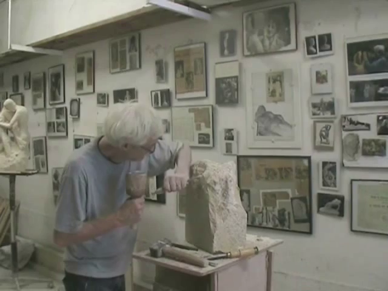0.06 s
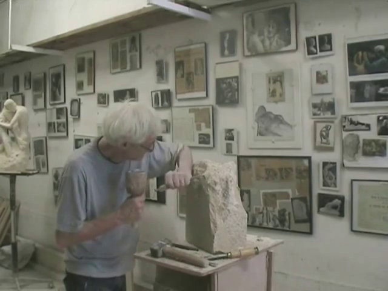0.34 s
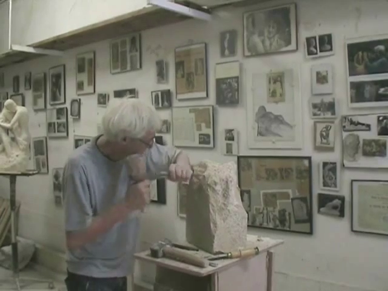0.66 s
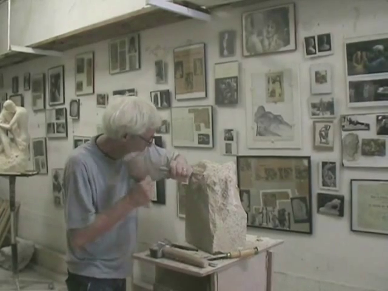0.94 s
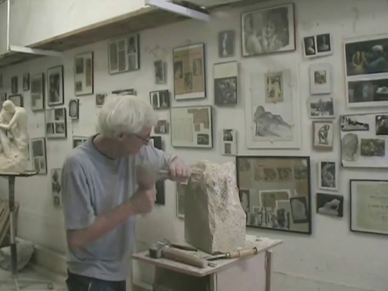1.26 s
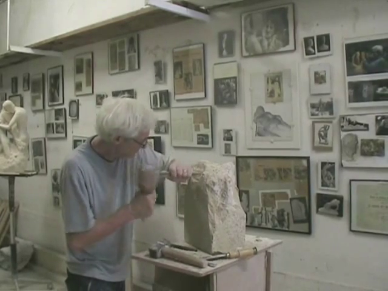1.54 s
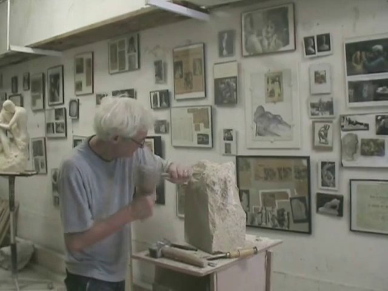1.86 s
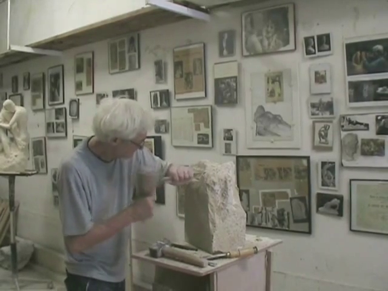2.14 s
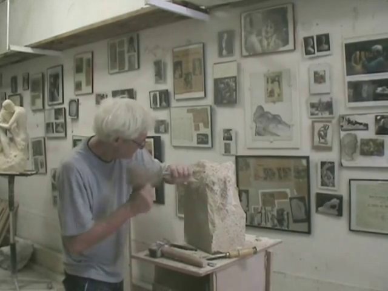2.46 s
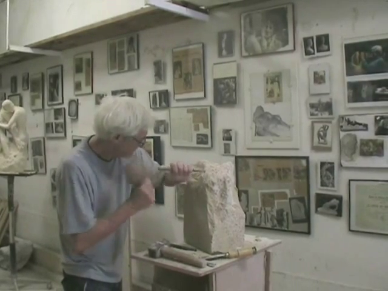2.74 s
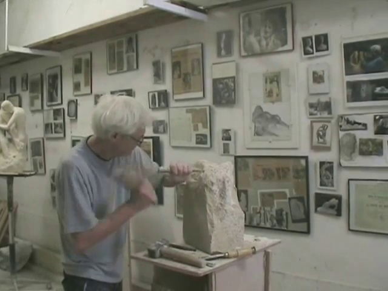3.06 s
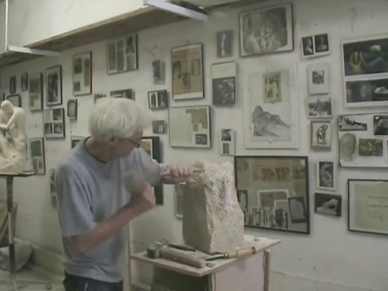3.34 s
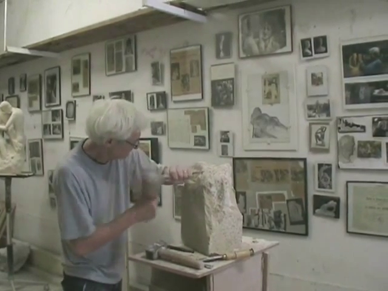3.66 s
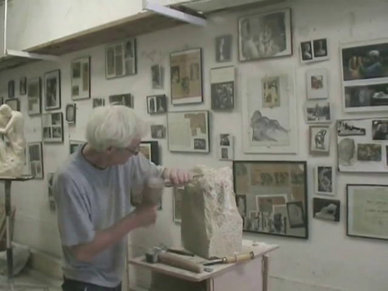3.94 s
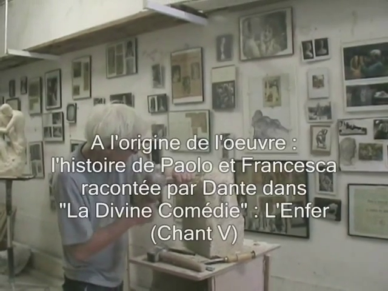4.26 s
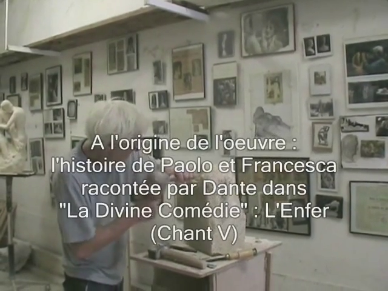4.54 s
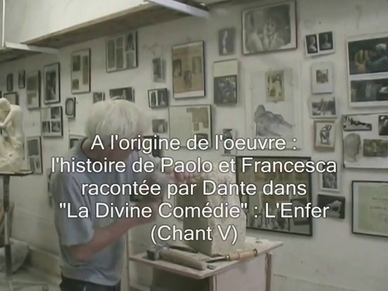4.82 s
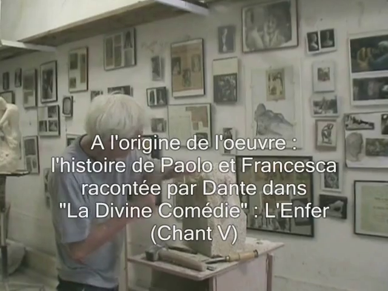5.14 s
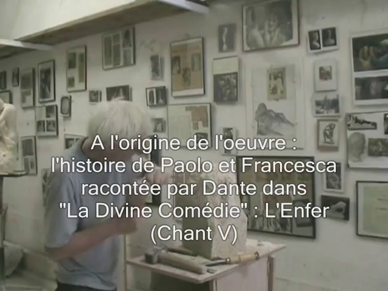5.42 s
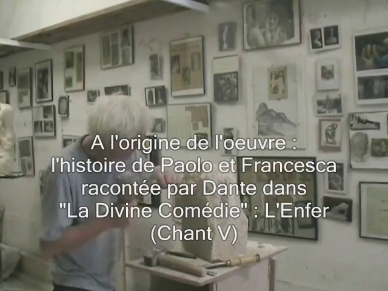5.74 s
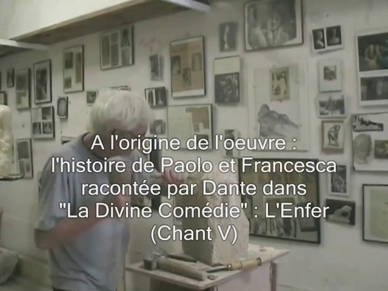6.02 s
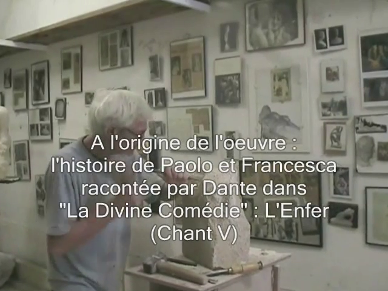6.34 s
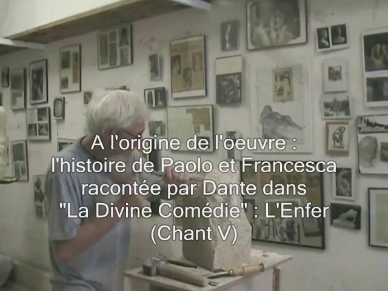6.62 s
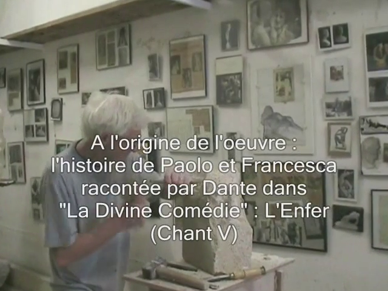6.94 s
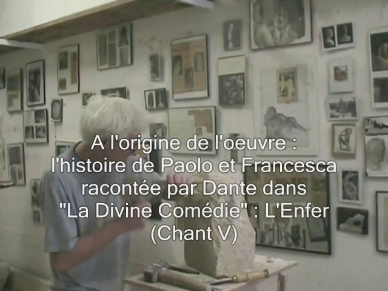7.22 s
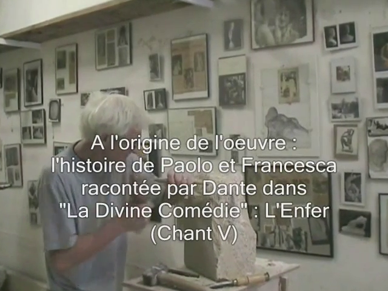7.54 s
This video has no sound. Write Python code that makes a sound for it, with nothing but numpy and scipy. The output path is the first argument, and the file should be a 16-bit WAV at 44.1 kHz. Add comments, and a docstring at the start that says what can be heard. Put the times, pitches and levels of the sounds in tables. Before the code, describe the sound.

A mallet strikes a steel chisel against a stone block on a wooden stand, nearly four times a second. Each sharp knock carries a metallic ping, a faint spray of grit and a low boom that rings through the studio. After a long run comes a short pause with a dull scuff and small ticks, then five more blows. The microphone overloads slightly on the strikes, over a steady room hush.

```python
"""A mallet drives a steel chisel into a stone block on a wooden stand: two even runs, bare studio.
Each blow is a short knock with a rebound; the shaft pings, crumbs spray, the stand booms, the room rings.
Chips tick, and something scuffs in the pause, over a steady hush.
Gain control ducks after each blow, and the attacks overload."""
import sys
import numpy as np
from scipy import signal
from scipy.fft import rfft, irfft, next_fast_len
from scipy.io import wavfile
from scipy.ndimage import uniform_filter1d

SR = 44100
rng = np.random.default_rng(int(sys.argv[2]) if len(sys.argv) > 2 else 0)


def transcribe(signal):
    """Save signal, clipped to [-1, 1], as a 16-bit WAV file at the path in sys.argv[1]."""
    frames = np.atleast_2d(signal).T
    limited = np.clip(frames, -1, 1)
    pcm = np.round(limited * 32767).astype(np.int16)
    wavfile.write(sys.argv[1], SR, pcm)


N = 343539

HUSH_SPECTRUM = [(25, -8), (55, -1), (80, -2), (220, 0), (500, -1), (740, -3), (1000, -8), (1600, -10),
                 (2500, -16), (5000, -22), (7200, -33), (11000, -39), (14000, -58)]  # room tone: freq_hz, density_db
HUSH_LEVEL = [(0, -40), (.7, -43), (7.79, -39)]  # room tone: time_s, level_db
RUMBLE_SPECTRUM = [(15, 5), (30, -5), (50, -11), (100, -27), (300, -45)]  # low rumble: freq_hz, density_db
ROOM_DECAY = [(100, 3), (200, 1.66), (560, 1.45), (1400, 0.74), (4000, 0.88), (10000, 0.55)]  # studio reverberation: freq_hz, t60_s
REFLECTIONS = [(.0046, -17.5), (.0072, -15.5), (0.0192, -20), (0.026, -22), (.038, -22.5)]  # first wall returns: delay_s, level_db
ECHO_SPECTRUM = [(30, -45), (65, -33), (100, -13.5), (140, -7), (200, -4), (270, -4), (700, -2.5),
                 (1120, 2.5), (1600, 0), (2500, -8.5), (5000, -16.5), (7500, -19), (11000, -46),
                 (13500, -41)]  # a blow as the room returns it: freq_hz, density_db
PORT_BALANCE = [(25, 4), (50, -3), (90, 9.5), (180, 1), (330, -1), (1000, 0.4), (5000, -0.5), (10000, 0)]  # microphone ports: freq_hz, left_minus_right_db

SCUFF_STROKES = [(5.67, 0.076, -32), (5.87, 0.1, -31.5), (6.13, 0.034, -37.5), (6.29, 0.09, -43)]  # dull rubs: peak_s, rise_s, level_db
WOOD_MODES = [(253, 50, -8), (352.5, 29, -3.5), (392, 4, 7.5), (450, 57, -16), (486, 11, 0.5),
              (568, 19, -4), (671, 11, -13)]  # rubbed wood: freq_hz, width_hz, level_db
BUMP_SPECTRUM = [(50, -37), (76, -14), (88, 10), (105, -10), (150, -35), (600, -88)]  # soft low bump: freq_hz, density_db
CHIP_TICKS = [(1.123, -38), (1.303, -24.5), (5.662, -28), (5.732, -36)]  # chips, light touches of steel on stone: start_s, level_db
TICK_SPECTRUM = [(300, -20), (1500, -13), (2700, -10.5), (5500, -10.5), (7500, -20), (11000, -24),
                 (15000, -31)]  # one tick: freq_hz, density_db

# mallet blows: start_s, force_db, stand_boom_db, block_thud_db, chisel_ring_db, grit_db, shaft_ping_db,
# rebound_s, rebound_ratio
MALLET_BLOWS = [(0.8784, -10.5, -4.5, 9, 7.5, -3.5, 9, 0.0014, 0.38),
                (1.1442, 1.0, 1.5, -2.5, -2.0, -4.5, -2, 0.0015, 0.51),
                (1.409, -0.5, -3.5, 1, -0.5, -4, 2, 0.00064, 0.07),
                (1.6728, 0, 5, -2.5, -0.5, -7.5, 1, 0.0011, 0.53),
                (1.9302, -1.5, 4.5, 0, -1, -1.5, -4, 0.0018, 0.3),
                (2.188, -0.5, -3.5, 1.5, 0.5, -1.5, 8, 0.0014, 0.18),
                (2.458, -1.5, -4.5, -0.5, -1, 0.5, -1.5, 0.0018, 0.35),
                (2.7265, -0.5, -10.0, 1.5, -1.5, -0.5, 1, 0.0014, 0.15),
                (2.9883, 1.5, 1.5, 3.5, -2.5, -0.5, -22, 0.00074, 0.6),
                (3.264, 2.5, -5, 2.5, -2, -2, -5, 0.0014, 0.05),
                (3.5344, -1.0, 3.5, 3, 0, -0.5, -9, 0.00089, 0.62),
                (3.8022, 1.5, -1, 1.5, 0.5, -0.5, 0, 0.001, 0.42),
                (4.0714, 3, -1, -1.5, -2.5, -1.5, -1, 0.002, 0.21),
                (4.351, 0.0, 6.5, 0, 2, 0, 0, 0.00162, 0.22),
                (4.6208, -0.5, -2.5, 3.5, 1.5, 3.5, -2, 0.000877, 0.59),
                (4.8832, -1.5, -6, 2.5, 0.5, 1.0, -2, 0.0014, 0.18),
                (5.1716, 0, 1.5, 0.5, -2.5, -2, 3.5, 0.0014, 0.06),
                (6.5255, -0.5, 1, -1.5, -1, -2.5, 0.5, 0.002, 0.25),
                (6.8159, 0.0, 6.5, -3.5, 1.5, -3, 1, 0.0021, 0.27),
                (7.1019, 1.0, -2.5, 1, -0.5, -5, 4, 0.001, 0.23),
                (7.3874, 0, 0.5, 1, -1, -5, -9, 0.00073, 0.56),
                (7.675, -0.5, 5.5, -2, 0, 0, 2.5, 0.00085, 0.15)]
KNOCK_MODES = [(480, -38, 0.043, 0.0055), (613, -1.5, 0.029, 0.0053), (726, -13.5, 0.1, 0.012),
               (800, -38, 0.077, 0.0086), (990, -11.5, 0.028, 0.0011), (1121, -6.5, 0.034, 0.00013),
               (1307, -1.5, 0.02, 0.00045), (1564, -18.5, 0.07, 0.00038), (1862, -15.5, 0.039, 0.0015),
               (2300, -17.5, 0.014, 0.000071), (3310, -14, 0.019, 0.00019), (4810, -9.5, 0.011, 0.00038)]  # chisel and block: freq_hz, level_db, t60_s, rise_s
RING_MODES = [(83.9, -19.5, 2.2), (177.5, -6, 0.91), (195.3, -9.5, .9), (436, -2.5, 0.63), (486, -4, 1.04),
              (613, -6.5, 0.58), (662, -15.5, 1.2), (717, -9.5, 1), (753, -7, 1.3), (980, -12, 0.48),
              (1042, 1.5, 0.56), (1142.5, 1, 0.8), (1230, -26, .8), (1280, -18, 0.48), (1460, -4, .6),
              (1546, -11.5, 0.66), (1794, -8, 0.46), (1857, -6, 0.78), (2003, -9, 0.56), (3040, -12, 0.87),
              (3140, -14, 0.98), (4200, -19, 0.64), (4470, -24, 2.1), (5340, -17, 0.77)]  # lasting resonances of stand, chisel and room: freq_hz, level_db, t60_s
SHAFT_MODES = [(3100, 100, -3), (4210, 70, -6.5), (5280, 410, -9.5), (6900, 340, -22), (10500, 600, -10.5)]  # hand-damped steel shaft: freq_hz, width_hz, level_db
STAND_SWELLS = [(0.013, 0.0034, -4), (0.035, 0.0063, -5), (.07, 0.011, 0.5), (0.111, 0.018, -13),
                (0.137, 0.0086, -7), (.161, .009, -1.5), (0.203, 0.011, -6), (.25, 0.016, -21)]  # stand's note between the walls: delay_s, width_s, level_db
CRUSH_SPECTRUM = [(40, -18), (300, -3), (1100, 2.5), (2200, -2), (4500, -4.5), (7000, -10), (11000, -16.5),
                  (15000, -14)]  # stone crushed at the edge: freq_hz, density_db
CRUMB_SPECTRUM = [(1000, -21), (2800, -4), (5200, 0), (7500, -12), (11000, -19), (15000, -35)]  # sprayed grains: freq_hz, density_db
BLOW_COLOUR = [(90, -1), (180, 1.5), (470, 2), (2600, 0.92), (6000, -1), (10500, -2.5)]  # common to all blows: freq_hz, gain_db
# bands moved by a blow's boom, thud, clang and grit: freq_hz, db_per_db
BOOM_BAND = [(110, 0.01), (165, 1), (220, 1), (320, 0.031)]
THUD_BAND = [(220, 0.15), (330, 1), (470, 0.98), (800, 0.0077)]
CLANG_BAND = [(750, 0), (1080, 1), (1220, 0.76), (1700, 0)]
GRIT_BAND = [(1500, 0.14), (4000, 0.95)]


def amp(db):
    """Decibels to gain."""
    return 10 ** (np.asarray(db) / 20)


def unit(x):
    """Scale to rms 1."""
    return x / np.sqrt(np.mean(x ** 2) + 1e-20)


def along(points, hz):
    """Interpolate (freq_hz, value) points on a log axis."""
    points_hz, values = np.transpose(points)
    return np.interp(np.log(hz + 1), np.log(points_hz + 1), values)


def filtered(x, response):
    """Apply a frequency response."""
    n = x.shape[-1]
    padded = next_fast_len(n + 8192)
    return irfft(rfft(x, padded) * response(np.fft.rfftfreq(padded, 1 / SR)), padded)[..., :n]


def noise(spectrum, shape):
    """Coloured noise, rms 1."""
    return unit(filtered(rng.standard_normal(shape), lambda hz: amp(along(spectrum, hz))))


def fade(t, t60_s):
    """Exponential decay, -60 dB at t60_s."""
    return np.exp(-np.log(1000) * t / t60_s)


def add(track, start_s, sound):
    """Mix a sound into the track."""
    start = max(0, round(start_s * SR))
    n = min(sound.shape[-1], track.shape[-1] - start)
    track[..., start:start + n] += sound[..., :n]


def spread(pair, side_db):
    """Mid and side to left and right."""
    return pair[0] + amp(side_db) * np.array([pair[1], -pair[1]])


def resonances(modes, hz):
    """Summed response of band-pass modes, alternating in sign."""
    return sum((-1) ** k * amp(db) * 1j * hz * width_hz / (mode_hz ** 2 - hz ** 2 + 1j * hz * width_hz)
               for k, (mode_hz, width_hz, db) in enumerate(modes))


def room_tone():
    """Steady studio hush, partly shared between the ports, over a faint rumble uncorrelated between them."""
    gain = amp(np.interp(np.arange(N) / SR, *np.transpose(HUSH_LEVEL)))
    hush = gain * spread(noise(HUSH_SPECTRUM, (2, N)), side_db=-3)
    return hush + amp(-49) * noise(RUMBLE_SPECTRUM, (2, N))


def reverberation(spectrum, t):
    """Stereo room tail; the treble dies first."""
    hz, frame_s, bands = signal.stft(noise(spectrum, (2, len(t))), SR, nperseg=512)
    decay = fade(frame_s, along(ROOM_DECAY, hz)[:, None])
    tail = signal.istft(bands * decay, SR, nperseg=512)[1][:, :len(t)]
    return spread(tail, side_db=-11.5) * (1 - np.exp(-t / 0.019))


def stroke(peak_s, rise_s, t60_s):
    """Soft contact envelope: Gaussian rise, exponential decay."""
    t = np.arange(N) / SR - peak_s
    return np.exp(-(np.minimum(t, 0) / rise_s) ** 2) * fade(np.maximum(t, 0), t60_s)


def scuff():
    """A low bump, then friction strokes stir wooden modes; the soft contact has no treble."""
    soft_wood = lambda hz: resonances(WOOD_MODES, hz) / (1 + (hz / 900) ** 4)
    rub = unit(filtered(rng.standard_normal((2, N)), soft_wood))
    pressure = sum(amp(db) * stroke(peak_s, rise_s, t60_s=0.74) for peak_s, rise_s, db in SCUFF_STROKES)
    bump = amp(-32) * stroke(peak_s=5.5, rise_s=0.058, t60_s=0.7) * noise(BUMP_SPECTRUM, N)
    return pressure * spread(rub, side_db=-20) + bump


def chips(room_db, t60_s):
    """Stone chips: bright ticks with a faint echo."""
    out, t = np.zeros((2, N)), np.arange(SR // 2) / SR
    for start_s, db in CHIP_TICKS:
        tick = fade(t, t60_s) * noise(TICK_SPECTRUM, len(t))
        add(out, start_s, amp(db) * (tick + amp(room_db) * reverberation(TICK_SPECTRUM, t)))
    return out


def stand_boom(t, pitch_hz, rough_rad):
    """The stand's low note rolls between the walls in swells."""
    delay_s, width_s, db = np.transpose(STAND_SWELLS)[:, :, None]
    swells = np.sum(amp(db) * np.exp(-((t - delay_s) / width_s) ** 2), axis=0)
    waver = noise([(10, 0), (30, 0), (100, -40)], (2, len(t)))
    return swells * np.sin(2 * np.pi * pitch_hz * t + rough_rad * waver)


def sinking_echo(t, start_hz, end_hz, glide_s, t60_s, rough_rad):
    """Hollow answer to the knock; pitch falls as it fades."""
    hz = end_hz + (start_hz - end_hz) * np.exp(-t / glide_s)
    waver = noise([(20, 0), (60, 0), (200, -40)], len(t))
    envelope = fade(t, t60_s) * (1 - np.exp(-t / 0.016))
    return envelope * np.sin(2 * np.pi * np.cumsum(hz) / SR + rough_rad * waver)


def crumbs(t, rate_per_s, t60_s):
    """Short spray of stone grains, a few much larger than the rest."""
    grains = (rng.random(len(t)) < rate_per_s / SR) * rng.laplace(size=len(t))
    return fade(t, t60_s) * unit(filtered(grains, lambda hz: amp(along(CRUMB_SPECTRUM, hz))))


def shaft_ping(t, t60_s, scatter_db):
    """Shaft partials hang in the room, at new strengths each blow."""
    modes = [(hz, width_hz, db + scatter_db * rng.standard_normal()) for hz, width_hz, db in SHAFT_MODES]
    pair = filtered(rng.standard_normal((2, len(t))), lambda hz: resonances(modes, hz))
    return fade(t, t60_s) * spread(pair, side_db=-39)


def knock(t, crush_db, crush_t60_s):
    """Chisel modes, slower block modes and crushing stone, plus first reflections."""
    hz, db, t60_s, rise_s = np.transpose(KNOCK_MODES)[:, :, None]
    detune, scatter = rng.standard_normal((2, len(KNOCK_MODES), 1))
    sign = (-1) ** np.arange(len(KNOCK_MODES))[:, None]  # neighbouring modes in antiphase
    envelope = amp(db + 4.1 * scatter) * fade(t, t60_s) * (1 - np.exp(-t / rise_s))
    modes = sign * envelope * np.sin(2 * np.pi * hz * (1 + 0.01 * detune) * t)
    crush = spread(noise(CRUSH_SPECTRUM, (2, len(t))), side_db=-11)
    direct = modes.sum(0) + amp(crush_db) * fade(t, crush_t60_s) * crush
    out = direct.copy()
    for delay_s, wall_db in REFLECTIONS:
        add(out, delay_s, amp(wall_db) * direct)
    return out


def bite(hz, force_db, boom_db, thud_db, clang_db, grit_db):
    """One blow's response, set by the strike and how the edge meets the stone."""
    return amp(force_db + along(BLOW_COLOUR, hz)
               + boom_db * along(BOOM_BAND, hz) + thud_db * along(THUD_BAND, hz)
               + clang_db * along(CLANG_BAND, hz) + grit_db * along(GRIT_BAND, hz))


def rebound(hz, delay_s, ratio, cutoff_hz=2930):
    """The chisel bounces and lands again, softer: a hollow comb response."""
    bounce = ratio / (1 + (hz / cutoff_hz) ** 2) * np.exp(-2j * np.pi * hz * delay_s)
    return (1 + bounce) / np.sqrt(1 + np.abs(bounce) ** 2 / 2)


def chiselling(knock_db, room_db, ring_db, shaft_db, sink_db, stand_db, crumbs_db, fresh_share):
    """Each blow wakes the same resonances and much the same echo, coloured by bite and rebound."""
    out, t = np.zeros((2, N)), np.arange(SR * 5 // 4) / SR
    mode_hz, mode_db, t60_s = np.transpose(RING_MODES)[:, :, None]
    envelope = amp(mode_db) * fade(t, t60_s) * (1 - np.exp(-t * mode_hz / 8))  # builds over 8 cycles
    modes = envelope * np.sin(2 * np.pi * (mode_hz * t + rng.random(mode_hz.shape)))
    common_tail = np.sqrt(1 - fresh_share) * reverberation(ECHO_SPECTRUM, t)
    answer = amp(stand_db) * stand_boom(t, pitch_hz=178.1, rough_rad=0.13)
    sink = sinking_echo(t[:SR // 3], start_hz=918, end_hz=379.2, glide_s=0.055, t60_s=0.19, rough_rad=1)
    add(answer, 0, amp(sink_db) * sink)
    for start_s, force_db, boom_db, thud_db, clang_db, grit_db, ping_db, rebound_s, ratio in MALLET_BLOWS:
        room = common_tail + np.sqrt(fresh_share) * reverberation(ECHO_SPECTRUM, t)
        ring = amp(0.82 * rng.standard_normal(len(RING_MODES))) @ modes
        blow = amp(room_db) * room + amp(ring_db) * ring + answer
        add(blow, 0, amp(knock_db) * knock(t[:SR // 6], crush_db=-5, crush_t60_s=0.05))
        add(blow, 0, amp(shaft_db + ping_db) * shaft_ping(t[:SR // 2], t60_s=0.52, scatter_db=2))
        add(blow, 0, amp(crumbs_db + grit_db) * crumbs(t[:SR // 3], rate_per_s=740, t60_s=0.4))
        colour = lambda hz: bite(hz, force_db, boom_db, thud_db, clang_db, grit_db)
        add(out, start_s, filtered(blow, lambda hz: colour(hz) * rebound(hz, rebound_s, ratio)))
    return out


def ports(x, lag_s):
    """Closely spaced microphone ports: the left lags, and the bass leans left."""
    half = np.array([[0.5], [-0.5]])
    balance = lambda hz: amp(half * along(PORT_BALANCE, hz))
    return filtered(x, lambda hz: balance(hz) * np.exp(-2j * np.pi * hz * lag_s * half))


def scene():
    """Chiselling, chips, scuff and room tone at the two ports."""
    blows = chiselling(knock_db=1.5, room_db=-12, ring_db=-23.5, shaft_db=-8, sink_db=-9,
                       stand_db=-19, crumbs_db=-28, fresh_share=0.13)
    low_cut = signal.butter(2, 55, "highpass", fs=SR, output="sos")  # the blows carry no deep bass
    mix = signal.sosfilt(low_cut, blows) + chips(room_db=-14, t60_s=0.11) + scuff() + room_tone()
    return ports(mix, lag_s=3.8e-5)


def gain_control(x, threshold_db, release_db_per_s, attack_s):
    """Gain drops fast above the threshold and recovers at a steady rate."""
    power = np.abs(uniform_filter1d(np.mean(x ** 2, axis=0), size=88))
    excess_db = np.maximum(10 * np.log10(power + 1e-12) - threshold_db, 0)
    ramp_db = release_db_per_s * np.arange(N) / SR
    held_db = np.maximum.accumulate(excess_db + ramp_db) - ramp_db
    pole = np.exp(-1 / (attack_s * SR))
    return x * amp(-signal.lfilter([1 - pole], [1, -pole], held_db))


def record(dry):
    """Gain control, soft clipping, band limit."""
    ducked = gain_control(dry, threshold_db=-2.5, release_db_per_s=40.5, attack_s=0.019)
    clipped = ducked / (1 + np.abs(ducked) ** 8) ** (1 / 8)
    rolloff_hz, top_hz = 12600, 15400
    band_limit = lambda hz: 1 / np.sqrt((1 + (hz / rolloff_hz) ** 20) * (1 + (hz / top_hz) ** 120))
    return filtered(clipped, band_limit)


dry = scene()
out = record(dry)
transcribe(out)
```